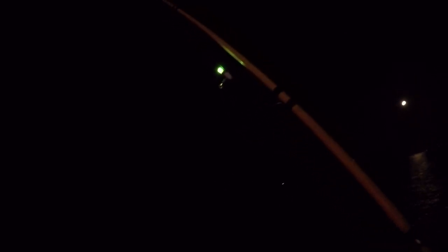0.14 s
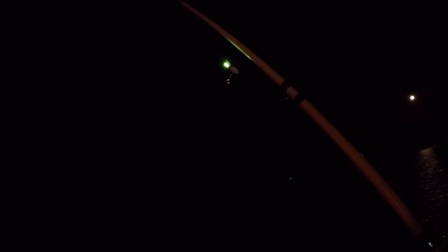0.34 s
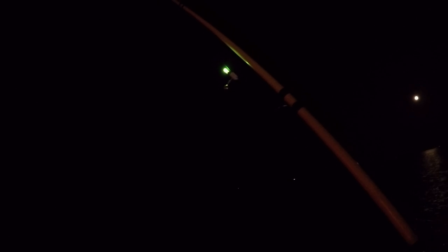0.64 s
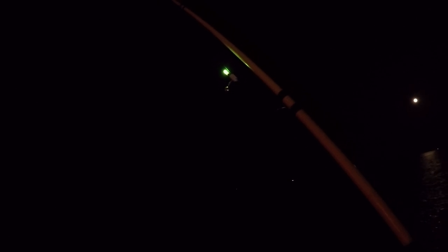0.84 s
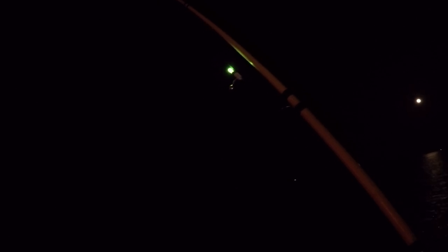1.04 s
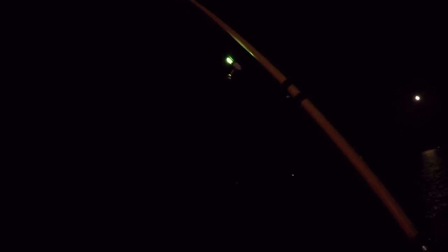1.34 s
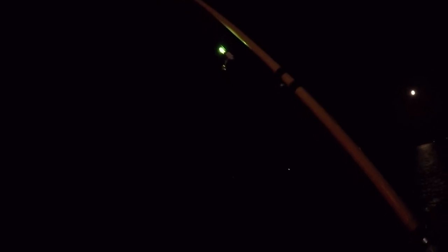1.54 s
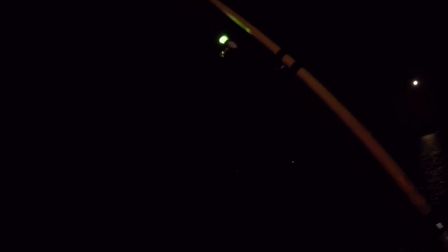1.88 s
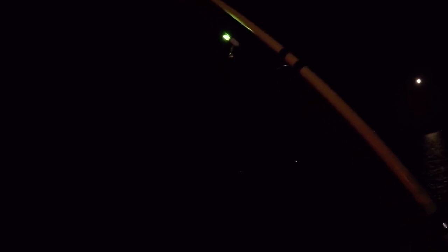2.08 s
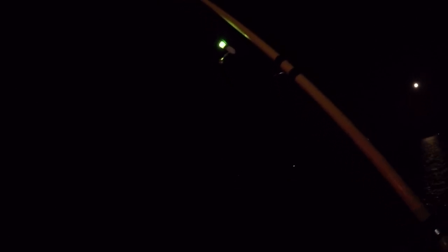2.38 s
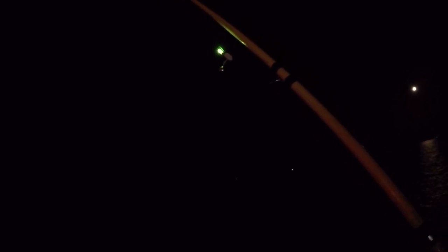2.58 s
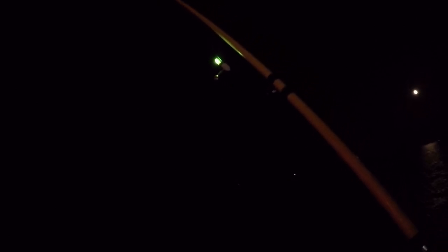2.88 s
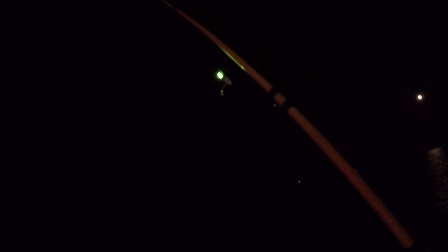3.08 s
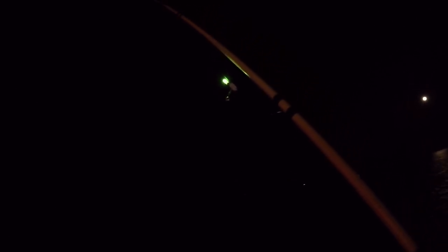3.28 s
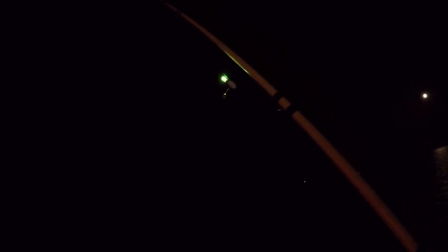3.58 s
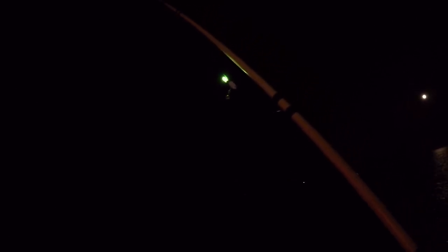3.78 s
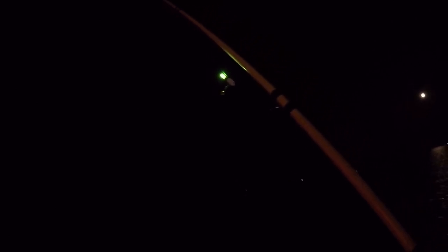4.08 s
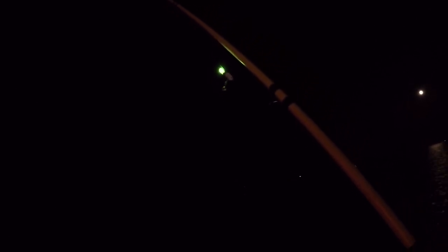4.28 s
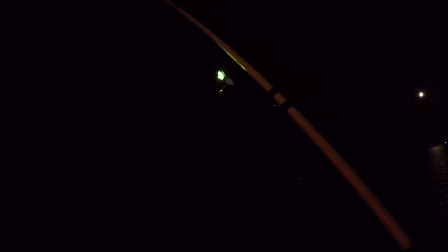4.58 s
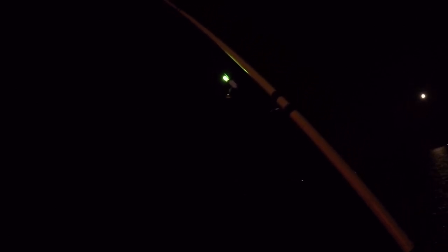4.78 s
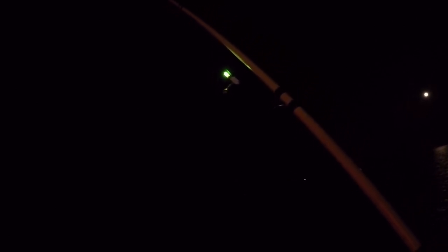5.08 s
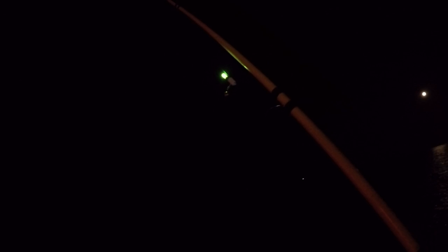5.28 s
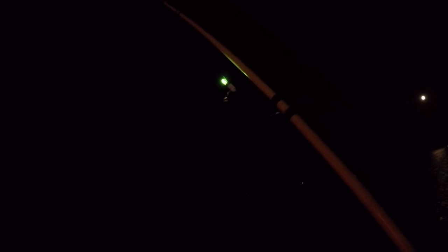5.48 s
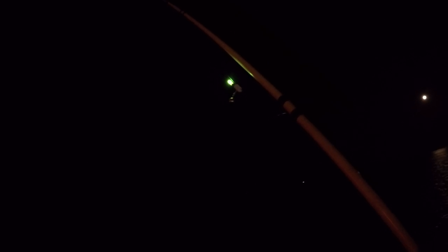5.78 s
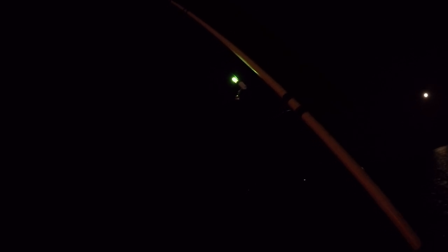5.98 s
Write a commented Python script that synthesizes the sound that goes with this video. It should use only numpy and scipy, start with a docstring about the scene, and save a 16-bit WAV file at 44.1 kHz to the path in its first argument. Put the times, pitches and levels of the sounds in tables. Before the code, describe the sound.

On a quiet night pier, a heavy clustered bump booms through the wooden deck immediately, with dry ticks. Wind rumbles low on the microphone over a faint water wash. A small rod bell then rattles busily, thin and metallic. A second bump thuds midway, followed by a weaker, shorter jingle. A taut line whistles faintly and water plops softly below. Close handheld stereo microphone, which dips after loud bumps.

```python
"""A quiet pier at night: wind rumbles on the microphone ports (low noise) over a wash of water (banded noise).
A heavy bump shakes the deck at once (struck board modes, humming noise), with dry ticks and splashes (noise bursts).
The fishing line sings faintly (wavering sines) and water laps below (rising bubble tones); from 1.3 s the bite
bell jingles, a loose ball rattling in a slit metal shell (restruck modes and short hollow resonances).
A second bump lands at 3.1 s, then the bell stirs again; gain control ducks the loud bumps and creeps back."""
import sys
import numpy as np
from scipy import signal
from scipy.io import wavfile
from scipy.ndimage import uniform_filter1d, minimum_filter1d

SR = 44100
rng = np.random.default_rng(int(sys.argv[2]) if len(sys.argv) > 2 else 0)


def wrap_up_sound(samples):
    """Save the sound to the file named by the first command line argument, as 16-bit audio."""
    columns = np.atleast_2d(samples).T
    # keep every value between -1 and 1, then stretch to whole-number steps
    tamed = np.clip(columns, -1, 1)
    steps = np.round(tamed * 32767).astype(np.int16)
    wavfile.write(sys.argv[1], SR, steps)


N = 270774

# Low rumble of wind and of the bumped deck, before lumps and panning; levels glide between points:
# time_s, buffet_db, deck_hum_db
RUMBLE_LEVELS = [(0, -10, -26), (0.029, -33.5, -28), (.07, -9, -15.5), (.25, -12.5, -9),
                 (.45, -21.5, -27.5), (.7, -29.5, -44.5), (.95, -26.5, -40), (1.15, -23.5, -34),
                 (1.4, -29, -37.5), (1.62, -29.5, -31.5), (1.82, -28.5, -39.5), (2.1, -24, -37.5),
                 (2.5, -23, -33.5), (2.85, -23, -32.5), (3.049, -26.5, -38.5), (3.13, -21.5, -32),
                 (3.17, -9, -19), (3.5, -18.5, -26), (3.85, -28.5, -41.5), (4.15, -23.5, -34.5),
                 (4.6, -29, -40.5), (4.85, -26.5, -38), (5.17, -27, -29.5), (5.5, -27.5, -42.5),
                 (6.14, -32, -40)]
BUFFET_PAN_DB, HUM_PAN_DB = -1.5, 2.5   # left minus right
BUFFET_LUMPS_DB, HUM_LUMPS_DB = 2, 2.5   # spread of each port's own swelling
BUFFET_LEAD_S, HUM_LEAD_S = 0.0025, 0.0014   # the shared part reaches the right port this much earlier

# Colour of the water wash: pitch_hz, relative density_db (per Hz)
WASH_COLOUR = [(150, -24.5), (200, -22.5), (500, -26.5), (1340, -32), (2400, -41.5), (3250, -45.5),
               (5000, -51.5), (7250, -40.5), (9830, -58.5), (13300, -57), (15000, -72)]
# How alike the wash is at the two ports: pitch_hz, likeness (-1 opposed to 1 identical)
WASH_LIKENESS = [(200, 0.47), (700, -0.077), (1400, -0.2), (3000, 0.48), (7000, -0.38), (14000, 1)]
WASH_DB = -43.5

# Bumps and their bounces: start_s, lower_boards_db, upper_boards_db, share of the free ring time,
# boom_left_db, boom_right_db
KNOCKS_ON_DECK = [(0.028, -27, -15, 0.69, -5.5, -13), (0.036, 2.5, 8, 0.62, 6.5, -16),
                  (0.046, -7, -3, 0.66, 10, -8), (0.051, -5.5, -11.5, 0.65, 4, 3),
                  (0.066, -19.5, -1.5, 0.66, 8.5, -6.5), (0.077, -7.5, -5.5, 0.91, 7, 8),
                  (0.085, -9, -5.5, 0.97, -6.5, 5), (0.096, -3.5, -8, 0.85, -27, -10.5),
                  (0.103, -15, -9, 0.72, -9, 1), (0.131, -5.5, -4.5, 0.55, -13.5, -7.5),
                  (0.149, -16.5, -13.5, 0.73, 0, -0.5), (0.165, -8, -12, 0.82, -16, -20),
                  (0.196, -3, -8, 0.35, -27, -19), (0.221, -20, -29, 0.96, -11, -25),
                  (0.253, -12, -18, 0.37, -16, -26), (0.296, -17.5, -23.5, 0.38, -3.5, -10),
                  (0.356, -31, -47, 0.72, -23, -16), (0.378, -35.5, -48, 0.35, -22, -22),
                  (3.131, -26.5, -25, 0.69, -37, -27), (3.138, -1, 8.5, 0.43, 6, -21.5),
                  (3.146, -11, -3, .7, 7, -13.5), (3.152, -18, -8.5, 0.62, 3, -15),
                  (3.162, -9.5, -13, 1, 2.5, 11.5), (3.191, -15.5, -23, 0.86, 1.5, -6),
                  (3.21, -17.5, -20, 1, -9.5, -6), (3.231, -8, -11.5, 0.74, 1, -17),
                  (3.251, -25, -17, 0.93, -3, 0), (3.297, -8, -17.5, 0.47, -5.5, -9.5),
                  (3.338, -20.5, -29, 0.77, -2, -15), (3.39, -44, -46, .6, -17, -5)]
# Modes of the knocked boards: pitch_hz, level_db, free t60_s, left_minus_right_db, left_lead_radians
BOARD_MODES = [(196.1, -4, 0.31, -0.5, 1.6), (243.2, 0, .09, 6.5, 0.26), (301.2, -6, 0.08, 9, 0.82),
               (343.6, 1, 0.098, 12.5, -0.25), (388.2, -10, 0.14, -2.5, 0.52),
               (552.2, -3.5, 0.051, 6.5, -1.01), (649.2, -1, 0.061, 8.5, -1.81), (1193, -1, 0.02, -2, 0.42)]
UPPER_BOARDS_HZ = 450   # boards above this follow the upper column
BOOM_HZ, BOOM_T60_S = 136, 0.3
CRACK_DB, CRACK_SLOPE, CRACK_T60_S = -21, 0.88, 0.035   # level, dB per dB of upper knock, decay

# Dry ticks from rod and bell clamp, and duller splashes: start_s, level_db, length_s (to fall 20 dB), pitch_hz
SNAP_EVENTS = [(0.046, -27, 0.015, 2000), (0.049, -43, 0.012, 3200), (0.054, -34, 0.014, 2300),
               (3.143, -29, 0.0018, 3310), (3.156, -29.5, 0.0092, 1870), (5.064, -51, .004, 6500),
               (5.407, -49, .004, 5200), (1.617, -43, .004, 7300), (1.843, -33.5, 0.094, 1490),
               (2.122, -42, 0.0025, 8000), (2.43, -32, 0.012, 1430), (2.8, -45.5, 0.0024, 7660),
               (2.871, -47, .003, 8000), (3.571, -43, 0.0031, 9150), (3.784, -53, 0.069, 7760),
               (3.799, -49, .004, 8500), (4.558, -48.5, 0.059, 7600), (4.565, -37.5, 0.052, 1700),
               (5.7, -45, 0.004, 6900), (5.7003, -43, 0.005, 4200), (5.7006, -46, 0.005, 2400),
               (0.56, -48, .01, 3600), (0.181, -46, .004, 6550)]

# Phrases sung by the taut line in the wind; points of each: time_s, pitch_hz, level_db (before flicker and waver)
LINE_PHRASES = [
    [(.1, 2260, -66), (.3, 2260, -63), (.5, 2260, -66)],
    [(.3, 1400, -62), (.55, 1500, -62), (.8, 1570, -62)],
    [(.37, 2800, -64), (.41, 2840, -62), (.46, 2985, -61), (.6, 3110, -65)],
    [(1.12, 2960, -66), (1.2, 3080, -68), (1.3, 3150, -70), (1.39, 3320, -66), (1.43, 3200, -65),
     (1.46, 2950, -62)],
    [(2.98, 1480, -62), (3.13, 1550, -60)],
    [(3.47, 1250, -60), (3.52, 1300, -56), (3.58, 1240, -60)],
    [(3.9, 2695, -64), (4.11, 2750, -62), (4.3, 2815, -61), (4.35, 2950, -63)],
    [(4.9, 2550, -66), (4.99, 2585, -63), (5.03, 2635, -58), (5.11, 2562, -57), (5.16, 2600, -58),
     (5.2, 2580, -58), (5.24, 2615, -58), (5.26, 2575, -58), (5.31, 2595, -58), (5.34, 2555, -56),
     (5.42, 2565, -59), (5.45, 2590, -57), (5.51, 2550, -55), (5.64, 2572, -57), (5.7, 2605, -58),
     (5.74, 2610, -60), (5.76, 2660, -60), (5.87, 2678, -58), (5.98, 2680, -64)],
]
LINE_WAVER_HZ, LINE_FLICKER_DB = 9, 1.6   # spread of the pitch and level wander

# Laps of water under the deck: start_s, level_db (before the swell shape), starting pitch_hz
LAPS = [(0.899, -29, 336), (1.568, -26.5, 257), (1.66, -31.5, 460), (2.03, -31, 530), (2.089, -35, 406),
        (2.46, -32.5, 535), (2.628, -37, 1130), (4.139, -42, 2000), (4.65, -32, 596), (5.111, -37, 418),
        (5.289, -47, 390), (5.299, -34, 754), (5.52, -35, 740), (5.7, -38.5, 890)]

# Clear contacts of ball and shell: start_s, tick_db, bright_edge_db, then the ring left behind:
# low_modes_db, first_middle_db, second_middle_db, top_cluster_db
BALL_CONTACTS = [(1.287, -36.5, -43, -58, -73, -73, -61), (1.329, -41.5, -48, -83.5, -77, -76.5, -62),
                 (1.576, -44, -38, -52, -57, -77, -65), (1.5862, -39, -49, -53.5, -62, -62, -53),
                 (1.6007, -40, -44, -59, -61, -58, -61), (1.6731, -31.5, -40, -41.5, -67, -56, -60),
                 (1.691, -42, -42, -50, -57, -61, -52), (1.7082, -41, -49, -49, -57, -65, -55),
                 (1.726, -25, -35, -44, -60, -65, -51), (1.7314, -34, -42, -47, -64, -66, -52),
                 (1.7355, -25, -30, -35, -54, -57, -40.5), (1.7488, -24.5, -32, -56, -48, -43, -35),
                 (1.752, -30, -28, -44.5, -48, -54, -40), (1.7724, -34, -36, -44, -59, -54, -38.5),
                 (1.8038, -37, -41, -45, -56, -43.5, -46), (1.822, -38, -29, -40.5, -54, -46, -46),
                 (1.847, -28, -29, -41.5, -50, -53, -44), (1.854, -36, -37, -42, -52, -49, -46),
                 (1.869, -29, -37, -35, -39, -51, -46), (1.8745, -29, -22, -29, -39, -43, -46),
                 (1.8785, -21, -27, -29.5, -36.5, -52, -44), (1.9063, -23, -26, -36, -64, -42, -40),
                 (1.9184, -38, -46, -41, -41, -39, -45), (1.9285, -21.5, -26, -43, -53, -31.5, -42),
                 (1.933, -30, -28, -37.5, -60, -43.5, -35.5), (1.975, -35, -43, -42, -52, -54, -38),
                 (1.981, -32, -38, -40.5, -52, -55, -39), (1.9999, -27, -19, -38, -51, -55, -34.5),
                 (2.0138, -25, -31, -41, -54, -55, -34), (2.024, -30, -29, -44, -57, -41, -33),
                 (2.0304, -36, -37, -30.5, -58, -42, -38), (2.034, -35, -36, -36, -48, -39, -33.5),
                 (2.0474, -16, -26, -39, -38, -32, -37), (2.0595, -42, -35, -40, -54, -34.5, -37),
                 (2.076, -32, -32, -44.5, -38, -44, -34.5), (2.1007, -28, -31, -36.5, -46, -44, -37),
                 (2.114, -39, -31, -39, -44, -44, -41), (2.1214, -34, -32, -47, -41, -39, -42),
                 (2.137, -41, -49, -47.5, -37.5, -44, -42), (2.175, -31, -36, -40, -42, -44, -43),
                 (2.1924, -25, -35, -41, -44, -45, -49), (2.2157, -35, -35, -42.5, -53, -55, -43.5),
                 (2.2363, -28.5, -48, -37.5, -51, -53, -44), (2.2534, -40, -40, -38, -55, -47.5, -43),
                 (2.2756, -35, -45, -61, -58, -51, -47), (2.2844, -30, -37, -39, -68, -58, -48),
                 (2.2908, -31, -35, -34, -58, -60, -48), (2.3026, -28, -43, -33.5, -61, -52, -44),
                 (2.315, -30, -39, -37, -65, -64, -43), (2.3242, -23.5, -37, -42.5, -55, -69, -40.5),
                 (2.357, -35, -36, -41, -56, -62, -41.5), (2.4244, -37, -39, -54, -61, -61, -48),
                 (2.461, -32, -42, -49, -69, -69, -51.5), (2.4706, -38, -50, -54.5, -69, -68, -56),
                 (2.5235, -34, -38, -52.5, -59, -55, -40.5), (2.5387, -34.5, -41, -45, -58, -49, -38),
                 (2.546, -40, -45, -55, -63, -59, -45), (2.5606, -39, -46, -55, -71, -69, -52),
                 (2.5829, -42, -49, -56, -71, -69, -58), (2.6224, -45, -44, -64, -67, -66, -56),
                 (2.6742, -40.5, -47, -58.5, -68, -65, -60), (3.806, -41, -60, -55, -81, -53, -51),
                 (3.815, -37, -53, -46, -52, -56, -49), (3.836, -36, -51, -42.5, -56, -66, -47),
                 (3.845, -34, -51, -50.5, -58, -54, -50), (3.9012, -42, -51, -55, -81, -77, -55),
                 (3.9828, -44, -56, -62, -72, -77, -60), (4.1051, -45, -50, -62, -73, -66, -58),
                 (4.4632, -41, -47, -59, -68, -68, -61), (4.4762, -40, -51, -59, -67, -67, -66),
                 (4.5634, -42, -44, -50, -61, -65, -49), (4.5804, -33, -34, -43.5, -61, -57, -35.5),
                 (4.594, -33, -46, -50, -71, -65, -40.5), (4.612, -39, -47, -51, -75, -69, -45),
                 (4.615, -41, -44, -40.5, -62, -59, -46), (4.6364, -45, -51, -43.5, -55, -58, -44),
                 (4.644, -36, -43, -46, -57, -52, -47), (4.664, -37, -42, -44, -56, -55, -50),
                 (4.677, -34, -45, -40.5, -54, -58, -39.5), (4.6977, -34, -51, -42.5, -62, -56, -43),
                 (4.7054, -43, -51, -48, -63, -63, -47), (4.7127, -36, -47, -51, -63, -63, -41),
                 (4.719, -42, -44, -58, -65, -65, -49), (4.7244, -52, -46, -60, -58, -62, -45),
                 (4.734, -50, -46, -55, -51, -64, -45), (4.7726, -35, -37, -41.5, -46, -48, -41),
                 (4.783, -44, -44, -44.5, -43, -48.5, -40), (4.799, -36, -38, -45, -45, -57, -42.5),
                 (4.827, -45, -45, -47, -62, -53, -47), (4.837, -42, -44, -50, -61, -61, -52),
                 (4.859, -51, -49, -61, -65, -65, -53)]
# Pitch of each shell mode: pitch_hz
SHELL_PITCHES = [2541, 2679, 6110, 6344, 11802, 11886, 12114, 12199]
# Which ring column drives each shell mode: column (0 low, 1 and 2 middle, 3 top)
SHELL_DRIVE = [0, 0, 1, 2, 3, 3, 3, 3]
# Voice of each shell mode: level_db, free t60_s, left_minus_right_db, left_lead_radians
SHELL_MODES = [(5.5, 0.32, 1, -0.69), (-7, .1, -2, 0), (1.5, 0.29, 3, 0.89), (3, 0.21, 6.5, -1),
               (-4, 0.25, -11, 0.45), (-3, 0.22, -4, 0.9), (-7, 0.3, -6, -0.53), (-7.5, 0.3, -4, -0.81)]
# Short resonances of the hollow: pitch_hz, level_db, t60_s, left_minus_right_db
HOLLOW_TICKS = [(2920, -14, 0.015, 5), (3210, -15, 0.011, -3), (3290, -12, 0.015, 6),
                (3405, -9.5, 0.025, 0), (3496, -9, 0.018, -1), (3570, -12, 0.014, 0), (3900, -23, 0.036, 2),
                (3550, -27, 0.00043, -10), (7400, 4.5, 0.0012, -2), (9700, -9, 0.0025, -12),
                (12700, -8, 0.002, -5)]
# Stretches where the ball rolls lightly round the shell: start_s, end_s, level_db (of the strongest touches)
BALL_ROLLS = [(1.786, 1.842, -34.5), (2.118, 2.146, -36), (2.25, 2.303, -37), (2.327, 2.382, -41),
              (2.474, 2.495, -41), (2.55, 2.6, -42), (4.602, 4.73, -39), (4.78, 4.854, -44)]
ROLL_PER_S = 220   # mean touches per second
UNEVEN_DB = 2   # a mode's level scatters from contact to contact
# Below this low-mode level the ball stays against the shell and shortens the ring: dB per dB, down to a share
SETTLE_DB, SETTLE_SLOPE, SETTLE_MOST = -49.5, 0.85, 0.23
PATTER_PER_S, PATTER_T60_S = 600, 0.085   # mean taps per second, decay
PATTER_DB, PATTER_EDGE_DB = -16, -34   # taps in the hollow; a dense scrape in the bright edge
EDGE_T60_S = 0.004   # resonances shorter than this follow the edge column
CHATTER_S, CHATTER_DB = 0.005, -15   # every contact is a short chatter (t60, level), not one clean tap
EDGE_TAP_DB, EDGE_CHATTER_S = -9, 0.008   # in the bright edge: softer tap, longer chatter

LIMIT_DB, MOST_CUT_DB = -7, 10.5   # gain control threshold and deepest cut
CUTOFF_HZ = 15600


def amp(db):
    """Decibels to gain."""
    return 10 ** (np.asarray(db, float) / 20)


def rms_one(x):
    """Each channel scaled to rms 1."""
    return x / np.sqrt(np.mean(x ** 2, axis=-1, keepdims=True) + 1e-20)


def pan(x, db):
    """Two channels, the left louder by db."""
    return x * amp([[db / 2], [-db / 2]])


def at_hz(points, hz):
    """A table read on a log-frequency axis."""
    table_hz, value = np.transpose(points)
    return np.interp(np.log(hz), np.log(table_hz), value)


def band(x, low_hz, high_hz, order=2):
    """Butterworth band-pass."""
    return signal.sosfilt(signal.butter(order, [low_hz, high_hz], "band", fs=SR, output="sos"), x)


def drift(rate_hz):
    """Slow random wander with spread 1, made at a fortieth of the sample rate."""
    r = np.exp(-80 * np.pi * rate_hz / SR)
    noise = rng.standard_normal(N // 40 + 2002)
    slow = signal.lfilter([1], [1, -2 * r, r * r], noise)[2000:]
    return np.interp(np.arange(N) / 40, np.arange(len(slow)), rms_one(slow))


def clicks(start_s, db):
    """Single samples at the given times."""
    out = np.full(N, 1e-18)
    out[(np.asarray(start_s) * SR).astype(int)] = amp(db)
    return out


def dying(x, t60):
    """Every click leaves an exponential tail that falls 60 dB in t60 seconds."""
    return signal.lfilter([1], [1, -amp(-60 / (t60 * SR))], x)


def ring(x, hz, t60):
    """A two-pole resonator: a unit click sets a decaying sine of starting height 1 ringing."""
    r, w = amp(-60 / (t60 * SR)), 2 * np.pi * hz / SR
    return signal.lfilter([0, np.sin(w)], [1, -2 * r * np.cos(w), r * r], x)


def restruck(start_s, db, hz, t60, rise_s, slips):
    """A mode, as a turning arrow, whose every contact stops the old ringing and starts another, phase slipped."""
    t = np.arange(N) / SR
    last = np.maximum(np.searchsorted(start_s, t, "right") - 1, 0)   # latest contact at each sample
    since_s = np.maximum(t - start_s[last], 0)
    t60_now = np.broadcast_to(t60, start_s.shape)[last]
    height = amp(db[last] - 60 * since_s / t60_now) * (t >= start_s[0])
    arrow = height * np.exp(1j * np.cumsum(slips)[last])
    r = np.exp(-1 / (rise_s * SR))
    eased = signal.lfilter([(1 - r) ** 2], [1, -2 * r, r * r], arrow)
    return eased * np.exp(2j * np.pi * hz * t)


def rumble():
    """Wind buffets as lumpy low noise, partly opposed at the two ports; the bumped deck hums near its boom pitch."""
    time_s, *levels = np.transpose(RUMBLE_LEVELS)
    buffet_db, hum_db = (np.interp(np.arange(N) / SR, time_s, level) for level in levels)
    left, own = rng.standard_normal((2, N))
    right = own - 0.68 * np.roll(left, -int(BUFFET_LEAD_S * SR))
    buffet = rms_one(band(np.array([left, right]), 20.7, 70.5, order=3))
    left, own = rng.standard_normal((2, N))
    right = own + 0.35 * np.roll(left, -int(HUM_LEAD_S * SR))
    raw_hum = np.array([left, right])
    hum_peak = band(band(raw_hum, 86, 138.1, order=3), 137.7, 162.0, order=1)
    hum = rms_one(hum_peak + 0.48 * band(raw_hum, 83.4, 153.4, order=4))
    buffet_db = buffet_db + BUFFET_LUMPS_DB * np.array([drift(8.5), drift(2.2)])
    hum_db = hum_db + HUM_LUMPS_DB * np.array([drift(8.4), drift(5.7)])
    return pan(buffet * amp(buffet_db), BUFFET_PAN_DB) + pan(hum * amp(hum_db), HUM_PAN_DB)


def water(patchy_db):
    """Distant wash in half-octave noise bands, each with its own flicker and likeness between ports."""
    out, together = 0, drift(1.5)
    edges_hz = 150 * 2 ** np.arange(0, 6.8, 0.5)
    white = rng.standard_normal((2, 2, N))   # neighbouring bands take turns on two noise pairs
    for k, (low_hz, high_hz) in enumerate(zip(edges_hz, edges_hz[1:])):
        mid, side = band(white[k % 2], low_hz, high_hz)
        hz = np.sqrt(low_hz * high_hz)
        alike = np.clip(at_hz(WASH_LIKENESS, hz), -1, 1)
        smooth = min(1, 1500 / hz)   # far hiss flickers less
        flicker_db = patchy_db * (0.077 * together + drift(16.0)) * smooth
        stereo = np.sqrt(1 + alike) * mid + np.sqrt(1 - alike) * side * [[1], [-1]]
        out = out + amp(at_hz(WASH_COLOUR, hz) + flicker_db) * stereo
    return amp(WASH_DB) * rms_one(out)


def bumps():
    """Each soft knock damps the boards, rings them anew and rattles them briefly; the boom swells more slowly."""
    start_s, lower_db, upper_db, free, left_db, right_db = np.transpose(KNOCKS_ON_DECK)
    free = np.clip(free, 0.1, 2)
    boards = np.zeros((2, N))
    for hz, db, t60, pan_db, lead in BOARD_MODES:
        uneven, slip = rng.standard_normal((len(start_s), 2)).T
        knock_db = (upper_db if hz > UPPER_BOARDS_HZ else lower_db) + db + 2.0 * uneven
        mode = restruck(start_s, knock_db, hz, t60 * free, 0.00038, 1.74 * slip)
        tone = np.imag(mode * np.exp([[1j * lead], [0]]))
        shake_level = np.abs(restruck(start_s, knock_db - 39.5, 0, 0.1 * free, 0.0027, 0 * start_s))
        shake = shake_level * rng.standard_normal((2, N))
        rattle = ring(shake[0] + 1.5 * shake, hz, t60)   # partly shared by the ports
        boards += pan(tone + rattle, pan_db)
    # dull contact; its top reaches the ports opposed
    top = amp(-11.5) * band(boards, 830, 1780, order=2) * [[1], [-1]]
    out = band(boards, 150, 658, order=4) + top
    crack = dying(clicks(start_s, CRACK_SLOPE * upper_db + CRACK_DB), CRACK_T60_S)   # harder blows crack more
    out += band(crack * rng.standard_normal((2, N)), 1900, 2300, order=3)
    slips = rng.standard_normal(len(start_s))
    for side, db in enumerate((left_db, right_db)):
        boom = restruck(start_s, db, BOOM_HZ, BOOM_T60_S, 0.002, slips)
        out[side] += np.imag(boom * np.exp(0.6j * side))
    return out


def snaps():
    """Ticks and splashes: bursts of noise nearly an octave wide that die fast."""
    noise, out = rng.standard_normal((2, N)), 0
    for start_s, db, length_s, hz in SNAP_EVENTS:
        burst = dying(clicks([start_s], db), 3 * length_s)   # 20 dB down after length_s
        out = out + band(burst * (noise[0] + 1.65 * noise), hz / 1.54, hz * 1.2)
    return out


def line():
    """Wind sheds thin tones from the taut line, wandering in pitch and coming and going."""
    out, t = np.zeros(N), np.arange(N) / SR
    for time_s, hz, db in map(np.transpose, LINE_PHRASES):
        level = amp(np.interp(t, time_s, db, -120, -120) + LINE_FLICKER_DB * drift(10.4))
        pitch_hz = np.interp(t, time_s, hz) + LINE_WAVER_HZ * drift(25)
        out += level * np.sin(2 * np.pi * np.cumsum(pitch_hz) / SR)
    return pan(uniform_filter1d(out, size=3), 0.78)


def plops():
    """Trapped air swells for 6 ms and dies away, rising in pitch as it rings."""
    out, t = np.zeros(N), np.arange(SR // 10) / SR
    swell = t / 0.016 * np.exp(1 - t / 0.006)
    for start_s, db, hz in LAPS:
        bubble = np.sin(2 * np.pi * hz * (t + 5.26 * t ** 2)) * swell
        out[int(start_s * SR):][:len(t)] += amp(db) * bubble
    return pan(out, 1.4)


def shell_ring(start_s, rings):
    """Each contact resets the metal shell's modes; a ball at rest against the shell shortens their ring."""
    free = np.clip(amp(SETTLE_SLOPE * (rings[0] - SETTLE_DB)), SETTLE_MOST, 1)
    out = np.zeros((2, N))
    for hz, column, (db, t60, pan_db, lead) in zip(SHELL_PITCHES, SHELL_DRIVE, SHELL_MODES):
        uneven, slip = rng.standard_normal((len(start_s), 2)).T
        mode_db = rings[column] + db + UNEVEN_DB * uneven
        mode = restruck(start_s, mode_db, hz, t60 * free, 0.00076, 0.838 * slip)
        out += pan(np.imag(mode * np.exp([[1j * lead], [0]])), pan_db)   # each mode beams its own way
    return out


def ball_ticks(start_s, tick_db, edge_db):
    """Taps, chatter, patter and light rolling of the ball excite the short resonances of the hollow."""
    t = np.arange(N) / SR
    taps = (rng.random(N) < PATTER_PER_S / SR) * rng.standard_normal(N) * amp(PATTER_DB)
    scrape = rng.standard_normal(N) * amp(PATTER_EDGE_DB)
    roll_level = sum(amp(db) * (t > begin) * (t < end) for begin, end, db in BALL_ROLLS)
    rolling = roll_level * (rng.random(N) < ROLL_PER_S / SR) * rng.uniform(0.28, 1, N)
    out = np.zeros((2, N))
    for hz, db, t60, pan_db in HOLLOW_TICKS:
        if t60 < EDGE_T60_S:
            hit_db, tap_db, chatter_s = edge_db, EDGE_TAP_DB, EDGE_CHATTER_S
            patter = dying(clicks(start_s, hit_db), PATTER_T60_S) * scrape
            low_hz, high_hz = 2570, 13000
        else:
            hit_db, tap_db, chatter_s = tick_db, 0, CHATTER_S
            patter = dying(clicks(start_s, hit_db), PATTER_T60_S) * taps + rolling
            low_hz, high_hz = hz / 1.29, hz * 1.11   # the hollow takes a moment to speak
        hits = clicks(start_s, hit_db + 3.1 * rng.standard_normal(len(start_s)))   # colour differs per hit
        noise = rng.standard_normal((2, N))
        chatter = dying(hits, chatter_s) * amp(CHATTER_DB) * (noise[0] + 0.7 * noise) / 1.37
        contact = uniform_filter1d(hits * amp(tap_db) + patter + chatter, size=3)
        out += pan(band(ring(contact, hz, t60), low_hz, high_hz) * amp(db), pan_db)
    return out


def bell():
    """The loose ball ticks in the hollow and sets the shell ringing at every contact."""
    start_s, tick_db, edge_db, *rings = np.transpose(BALL_CONTACTS)
    return shell_ring(start_s, rings) + ball_ticks(start_s, tick_db, edge_db)


def scene():
    """All sources, as they reach the two ports."""
    return rumble() + water(patchy_db=1.5) + bumps() + snaps() + line() + plops() + bell()


def record(dry, hold_s=0.25, release_db_per_s=10):
    """Gain control cuts quickly above the limit, holds and climbs back; then soft clipping and the cut-off."""
    t, hold, ahead = np.arange(N) / SR, int(hold_s * SR), SR // 500   # the cut looks 2 ms ahead
    level_db = 20 * np.log10(np.abs(dry).max(axis=0) + 1e-9)
    over_db = np.clip(level_db - LIMIT_DB, 0, MOST_CUT_DB)
    held_db = -minimum_filter1d(-over_db, hold, mode="constant", origin=(hold - 1) // 2 - ahead)
    climb_db = release_db_per_s * t
    cut_db = np.maximum.accumulate(held_db + climb_db) - climb_db
    even = dry * amp(-uniform_filter1d(cut_db, ahead))
    clipped = even / (1 + (even / 0.95) ** 8) ** (1 / 8)
    return signal.sosfilt(signal.cheby2(12, 70, CUTOFF_HZ, fs=SR, output="sos"), clipped)


dry = scene()
out = record(dry)
wrap_up_sound(out)
```